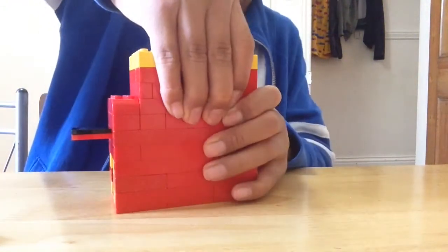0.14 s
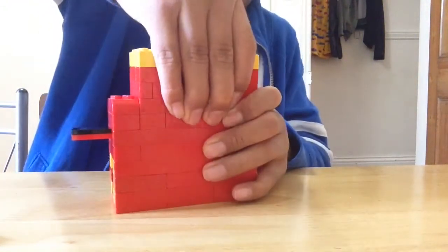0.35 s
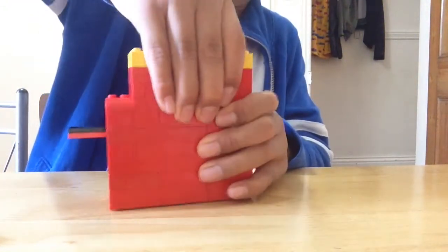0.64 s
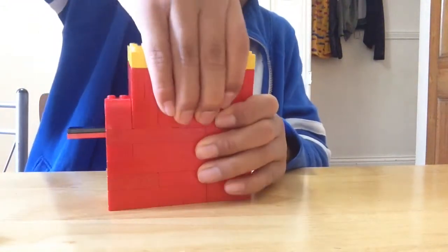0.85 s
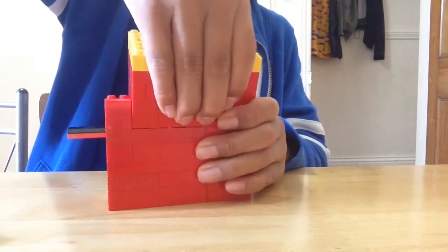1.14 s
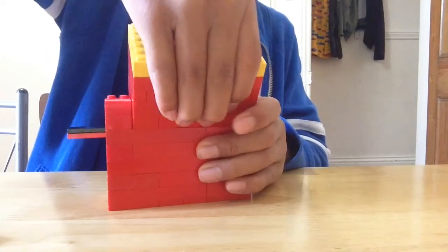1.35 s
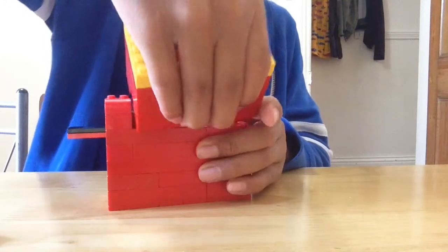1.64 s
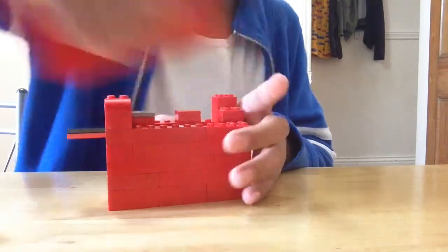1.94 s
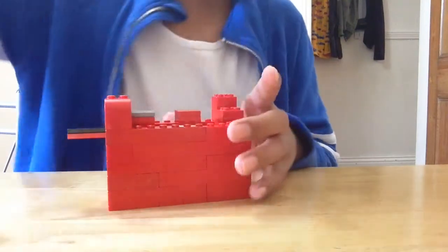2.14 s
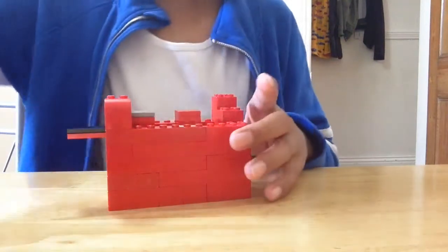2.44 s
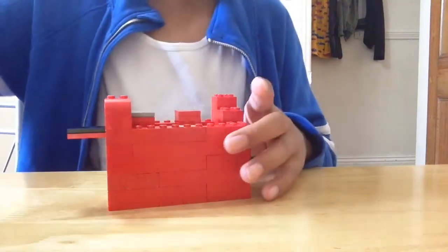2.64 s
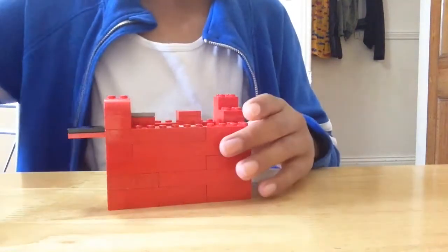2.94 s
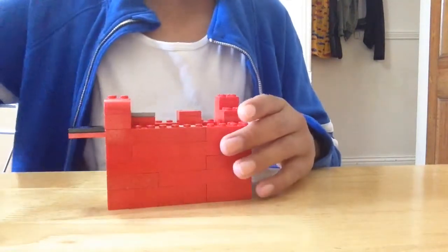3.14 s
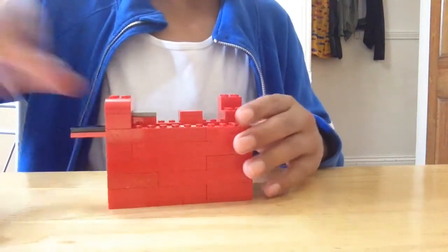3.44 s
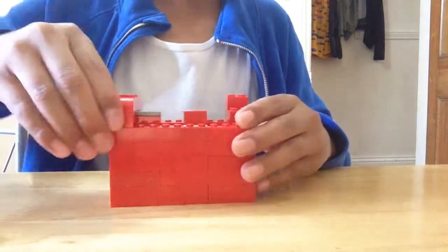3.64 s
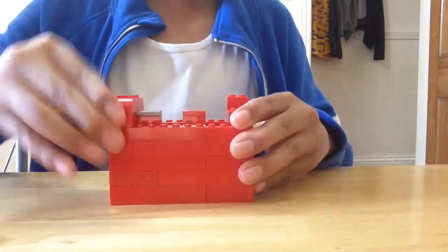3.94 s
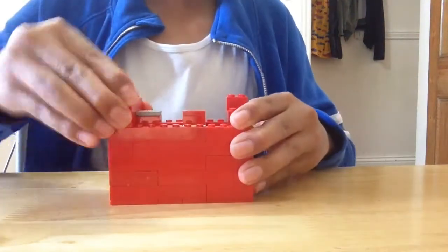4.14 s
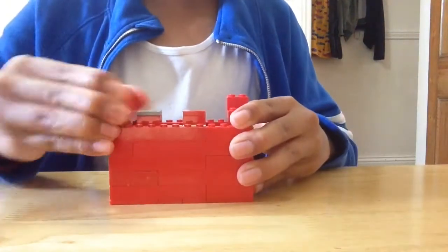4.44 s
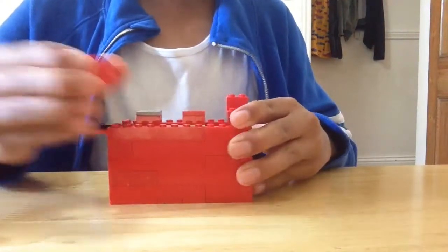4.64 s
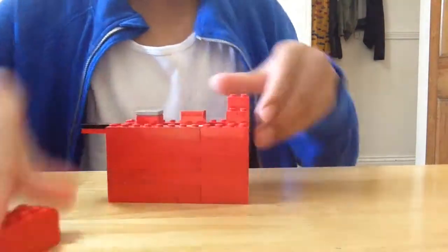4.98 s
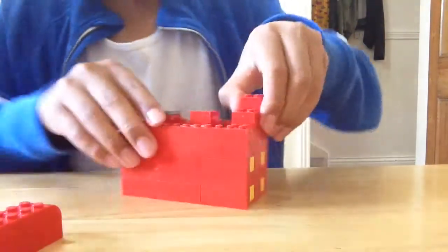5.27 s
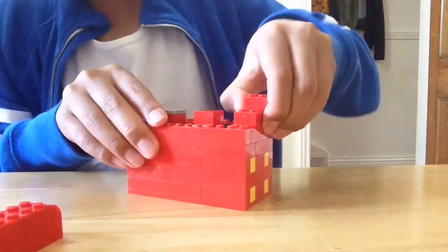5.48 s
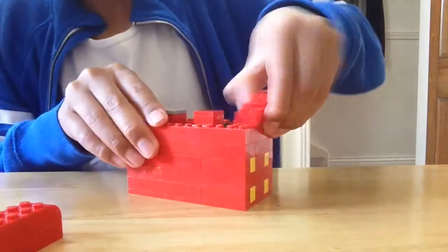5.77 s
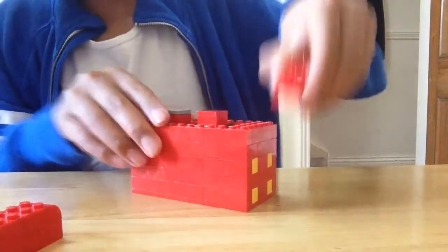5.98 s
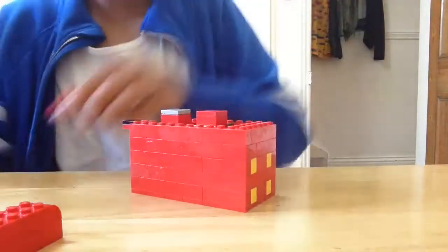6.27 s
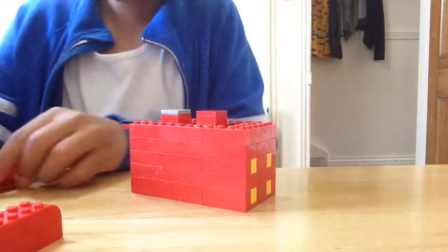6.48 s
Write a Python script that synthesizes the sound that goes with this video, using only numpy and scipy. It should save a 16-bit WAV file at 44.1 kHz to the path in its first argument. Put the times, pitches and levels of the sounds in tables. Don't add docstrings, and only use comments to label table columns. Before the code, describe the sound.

Close up in a small furnished room, plastic toy bricks are pulled apart on a wooden table. Clicks, stud pops and bumps come first, then creaking and a quiet gap. The house drops with a hard thud, loose pieces rattle and sweep, sharp clacks and a loud pop follow, and one small brick is set down. Steady microphone hiss and light sleeve rustle lie beneath.

```python
import sys
import numpy as np
from scipy import signal
from scipy.fft import rfft, irfft
from scipy.io import wavfile
from scipy.ndimage import uniform_filter1d

SR = 44100
rng = np.random.default_rng(int(sys.argv[2]) if len(sys.argv) > 2 else 0)


def generate_wav(sig):
    pcm = np.round(np.clip(np.atleast_2d(sig).T, -1, 1) * 32767).astype(np.int16)
    wavfile.write(sys.argv[1], SR, pcm)


def volts(x):
    e = np.asarray(x, float) / 20
    return 10 ** e


N = 291492
SIZE = 5120
BRICK_CYCLES = 20


def level(x, db):
    return x * volts(db) / np.sqrt(np.mean(x ** 2))


def band(x, lo_hz, hi_hz, order=2):
    return signal.sosfilt(signal.butter(order, [lo_hz, min(hi_hz, .45 * SR)], "band", fs=SR, output="sos"), x)


def highpass(x, hz, order=2):
    return signal.sosfilt(signal.butter(order, hz, "high", fs=SR, output="sos"), x)


def patches(length, hold, smooth):
    held = np.repeat(rng.standard_normal(length // hold + 1), hold)[:length]
    return uniform_filter1d(held, smooth)


def modes(hz, t60, db):
    step = np.exp(-2j * np.pi * np.arange(SIZE // 2 + 1) / SIZE)
    fade = np.exp(-np.log(1000) / t60 / SR)[..., None]
    turn = (2 * np.pi * hz / SR)[..., None]
    ring = fade * np.sin(turn) * step / (1 - 2 * fade * np.cos(turn) * step + (fade * step) ** 2)
    return np.sum(volts(db)[..., None] * ring, axis=-2)


def place(s, db, sounds):
    out = np.zeros(N + SIZE)
    for at, gain, sound in zip(s, volts(db), sounds):
        i = max(int(at * SR), 0)
        out[i:i + SIZE] += gain * sound / np.abs(sound).max()
    return out[:N]


# pitch in Hz, level in dB per Hz
HISS = [(59, -50), (100, -24), (123, -2), (196, 7), (400, 3.5), (1450, -5.5), (3840, -7), (7830, -8.5),
        (15000, -11.5)]


def hiss():
    hz, db = np.transpose(HISS)
    f = np.arange(N // 2 + 1) * SR / N + 1
    colour = volts(np.interp(np.log(f), np.log(hz), db))
    return level(irfft(rfft(rng.standard_normal(N)) * colour, N), -62.7)


# time in seconds, level in dB
RUSTLE = [(0.0, -50), (0.719, -58.5), (0.92, -54), (1.32, -59), (1.53, -71), (2.76, -78), (2.91, -64),
          (3.05, -89), (3.28, -42), (3.44, -50), (3.81, -55), (4.6, -53), (5.03, -46.5), (5.3, -51.5),
          (6.41, -65), (6.61, -67)]


def rustle():
    flicker = volts(2.9 * patches(N, 512, 512))
    brush = level(band(rng.standard_normal(N), 107, 1120) * flicker, -9.0)
    return brush * volts(np.interp(np.arange(N) / SR, *np.transpose(RUSTLE)))


def slip_run(chance, ms):
    t = np.arange(chance.shape[1]) / SR / (np.clip(ms, .2, 8)[:, None] / 1000)
    shape = np.sqrt(np.minimum(t / 0.66, 1) * np.exp(-t))
    run = rfft(chance * shape ** 2)
    return irfft(run / np.abs(run)) * shape


# pitch in Hz, level in dB
BRICK = [(740, -31.5), (960, -20), (1390, -25.5), (1740, -9.5), (2150, -3), (2600, 3.5), (3300, 5),
         (4000, 5), (4800, 2), (5500, 4), (6500, 3), (7800, 3), (9000, 3.5), (10600, 2.5), (12200, 2.5),
         (14000, 4.5)]
# start in seconds, peak level in dB, loudest ring in Hz, edge sharpness in dB.
CLICKS = [(.005, -23.5, 3880, 0), (.197, -30.5, 10200, 11), (.216, -19, 1000, -6.5), (.25, -21, 950, 1),
          (.299, -23, 2390, -52), (.826, -35, 2990, -5), (.962, -32, 11100, -6), (1.402, -34.5, 1550, -12),
          (4.211, -33, 1770, -30), (4.22, -28, 2230, -6), (4.579, -35.5, 1280, 22), (4.885, -13, 2580, -11),
          (4.901, -10, 2700, -14), (5.028, -27.5, 1406, -22), (5.039, -30, 1220, -25),
          (5.541, -19.5, 2960, 10), (6.567, -38.5, 1570, -20)]
BUMPS = [(.088, -16, 828, 5), (.453, -44, 930, -27), (.689, -27.5, 734, -31), (.71, -34, 1030, -9),
         (.736, -39, 732, -11), (1.297, -43, 1600, -16), (1.318, -45, 760, -30), (1.385, -50, 650, -19),
         (1.883, -43.5, 2600, -25), (1.908, -34, 1600, -6), (2.216, -50, 932, -21),
         (2.781, -15.5, 1010, -6), (2.913, -26.5, 1500, -27), (3.022, -26.5, 800, -27),
         (3.983, -33, 680, -40), (4.104, -44, 657, -17), (4.129, -37.5, 670, 2), (4.155, -35, 855, -24),
         (4.563, -35, 1150, -14), (5.15, -45, 845, -26), (5.796, -22, 783, 8), (5.849, -26.5, 2750, -19),
         (6.002, -43, 1457, -30), (6.021, -32.5, 660, -45), (6.314, -35, 978, -32),
         (6.383, -37.5, 689, -25), (6.518, -28, 1300, -25)]
TICKS = [(3.3345, -19, 7900, -2), (3.3415, -28, 2600, -15), (3.352, -25, 4500, -12),
         (3.3555, -18.5, 4200, -14), (3.3875, -25, 2800, -12), (3.404, -19, 3000, -15),
         (3.4115, -21, 2900, -14), (3.4155, -22, 3240, -17), (3.33, -29, 3500, -15),
         (3.365, -30, 3000, -15), (3.5485, -21, 7000, -2), (3.5535, -21, 10000, -2),
         (3.572, -25, 3500, -10), (3.585, -27, 3300, -8), (3.615, -28, 6800, -8), (3.626, -32, 3300, -10),
         (4.985, -21, 3000, -18), (4.991, -26, 2600, -18), (5.017, -25, 3900, -15),
         (4.9025, -5.5, 4530, -9), (1.4015, -33, 2420, -8), (.089, -20.5, 2100, -5)]
PINGS = [(.298, -20.5, 12500, -10), (.278, -28, 11500, -10), (.1, -31, 5000, -8), (.945, -31.5, 5500, -25),
         (.964, -36, 2300, -30), (1.059, -35, 8500, -10), (1.148, -41, 3100, -30), (1.404, -30, 1460, -35),
         (1.413, -34, 1900, -30), (1.419, -33, 1450, -30), (1.444, -35.5, 1400, -35), (2.99, -37, 9000, 0),
         (3.002, -29, 9000, 0), (3.029, -36, 2500, -30), (3.222, -32.5, 5740, -25),
         (3.25, -30.5, 2205, -35), (3.255, -31, 2800, -35), (3.288, -32, 2000, -35), (3.334, -21, 9560, -7),
         (3.341, -24, 2500, -35), (3.351, -28, 2000, -35), (3.355, -23, 3300, -30), (3.415, -28, 2830, -30),
         (3.423, -29, 3200, -35), (3.465, -33.5, 8950, -12), (3.563, -25, 6100, -25),
         (3.571, -30, 6200, -20), (3.607, -34, 3300, -35), (3.628, -40, 2500, -30), (3.683, -34, 6900, -20),
         (3.772, -37, 1388, -40), (4.185, -40, 11000, -10), (4.234, -43, 8460, -10), (4.297, -25, 1990, 3),
         (4.308, -32, 12000, -8), (4.455, -31.5, 795, -40), (4.462, -34, 3000, -30),
         (4.474, -32, 1600, -35), (4.489, -35, 900, -40), (4.566, -42.5, 2850, -35),
         (4.886, -18, 6700, -20), (4.902, -9, 5900, -20), (4.903, -19, 9000, -10), (4.982, -27, 6300, -25),
         (5.004, -23, 5500, -25), (5.015, -22, 5530, -25), (5.029, -29, 3800, -25), (5.039, -31, 5500, -30),
         (5.802, -19, 6800, -20), (5.813, -26, 3750, -25)]
SETTLES = [(5.829, -28, 730, -40.5), (6.32, -34, 910, -32), (6.454, -44, 900, -35), (6.467, -20, 7200, -12),
           (6.478, -23, 4300, -30), (6.482, -24, 4300, -30), (6.519, -30, 5200, -25), (.11, -37, 800, -38),
           (.123, -44, 830, -40), (4.44, -23, 2500, -25), (4.45, -35, 2700, -13), (4.47, -38, 2250, -10),
           (4.3, -30.5, 3230, -20), (.699, -32.5, 1630, -35), (2.939, -30, 1900, -30),
           (3.555, -25, 3200, -25), (3.566, -34, 1130, -35), (3.357, -29, 990, -40),
           (3.375, -35, 1150, -40), (3.389, -35, 1030, -40), (3.28, -29.5, 970, -40),
           (4.887, -21, 1380, -37), (4.99, -31, 1170, -35), (5.865, -33, 630, -40), (5.89, -37.5, 840, -40),
           (3.2, -41, 1200, -40), (5.606, -35, 3200, -24), (5.802, -19, 1600, -25)]
POPS = [(.256, -17, 1510, 20), (.32, -23.5, 2820, 8), (.944, -29, 2100, -30), (1.052, -24, 2190, -28),
        (1.147, -38, 2250, -34), (1.188, -40, 1360, -17), (2.705, -33, 10700, 14),
        (3.275, -18.5, 2190, -11), (3.322, -33, 2620, -22), (3.547, -34, 1430, -12),
        (3.868, -40, 1270, -24), (4.293, -22, 2500, -7), (4.98, -20, 2860, -24), (5.245, -40.5, 1610, -46),
        (5.604, -20, 803.5, -0.5), (5.801, -6.5, 3550, -9)]
TEARS = [(.265, -20, 2190, 8), (.793, -25.5, 1880, -4.5), (.926, -24, 2110, -0.5), (1.044, -22.5, 2220, -4),
         (2.346, -47.5, 1610, -12), (2.733, -30, 10700, -7), (2.765, -14, 1010, -14),
         (2.997, -30.5, 1460, -17), (3.809, -32.5, 2920, -44), (4.184, -33.5, 1953, -35),
         (5.003, -33, 2350, -30), (5.013, -19, 2340, -23), (5.514, -28.5, 2800, -7)]
RATTLE = [(2.894, -39, 1339, -13), (2.978, -30.5, 1350, -11), (3.222, -33, 3080, -32),
          (3.24, -25, 993, -28), (3.334, -32, 955, -25), (3.354, -22, 970, -32), (3.373, -26, 3050, -33),
          (3.387, -22, 3120, -34), (3.403, -25, 1350, -33), (3.411, -26, 2000, -33), (3.463, -34, 925, -17),
          (3.484, -29, 2720, -26), (3.553, -20, 9750, -5), (3.6, -34, 3900, -33), (3.648, -34, 1340, -28),
          (3.738, -33, 1400, -35), (4.324, -39, 880, -47)]
CLACKS = [
    (6.467, -11, 4030, -22),
    (4.439, -15.5, 1730, -4),
    (2.938, -26, 990, -28),
    (4.901, -12.5, 3980, -16),
    (4.915, -18.5, 6300, -16),
]
# events, weight of the low modes in dB, slip burst in ms, weight of the loudest ring in dB
CONTACTS = [(BUMPS, 9.6, 2.15, 4.3), (POPS, -4, 1.19, 4.3), (TEARS, -23, 3.7, 3.8), (CLICKS, -41, 1.58, 5),
            (RATTLE, -30, 1.25, -2), (CLACKS, -31, 1.33, 18), (PINGS, -40, 1.1, 22), (SETTLES, -40, 1.48, 17),
            (TICKS, -35, 0.37, 7.1)]


def snaps():
    events = [(*row, *kind) for rows, *kind in CONTACTS for row in rows]
    s, db, ring_hz, top_db, body_db, ms, ring_db = np.transpose(events)
    ring_hz, top_db, body_db, ring_db = (x[:, None] for x in (ring_hz, top_db, body_db, ring_db))
    hz, mode_db = np.transpose(BRICK)
    detune = rng.standard_normal((len(s), len(hz)))
    slips = slip_run(rng.standard_normal((len(s), 1024)), ms)
    octaves = np.log2(hz / 3000)
    low = np.clip(-octaves / 1.185, 0, 1) * (body_db + 23.5)
    high = np.clip(octaves / 1.81, 0, 1.4) * (top_db + 15)
    body = modes(hz * (1 + .03 * detune), BRICK_CYCLES / hz, mode_db + low + high)
    ring_t60 = np.minimum(2 * BRICK_CYCLES / ring_hz, .016)
    ring = modes(ring_hz * np.array([.955, 1.05]), ring_t60, ring_db - 2)
    f = np.arange(SIZE // 2 + 1) * SR / SIZE
    soft = (1 + 1j * f / (9000 * volts(0.39 * (top_db + 36.0)))) ** -2
    sound = irfft(rfft(slips, SIZE) * (body + ring) * soft, SIZE)
    return place(s, db + 1.0, highpass(sound, 420))


# delay in seconds, level in dB
ECHOES = [
    (.0025, -17),
    (0.013, -19.5),
    (0.017, -20),
    (0.021, -27.5),
]
# time in seconds, level in dB
FAR = [(0, -8.5), (.6, -13), (1.3, -7), (1.6, -7), (2.7, -11), (3.2, -7.5), (3.9, -12), (4.2, -15),
       (4.6, -9.5), (4.9, -13), (5.3, -12), (5.9, -8.5), (6.6, -11.5)]
# pitch in Hz, time to fade by 60 dB in seconds
ROOM_T60 = [(150, 0.53), (400, 0.49), (1000, 0.33), (2500, 0.3), (6000, 0.39), (14000, 0.29)]


def room(x):
    t = np.arange(SR // 2) / SR
    unit_db = -10 * np.log10(len(t))
    out = sum(volts(db) * np.r_[np.zeros(int(s * SR)), x][:N] for s, db in ECHOES)
    far_db = np.interp(np.arange(N) / SR, *np.transpose(FAR))
    responses = 4
    active = np.repeat(rng.integers(0, responses, N // 1024 + 1), 1024)[:N]
    for k in range(responses):
        tail = np.zeros(len(t))
        for hz, t60 in ROOM_T60:
            noise = band(rng.standard_normal(len(t)), hz / 2.24, hz * 1.1)
            tail += level(noise, 10 * np.log10(hz)) * volts(-60 * t / t60)
        tail = level(tail * np.minimum(t / 0.019, 1), unit_db)
        scatter = level(rng.standard_normal(len(t)) * volts(-60 * t / 0.057), 6 + unit_db)
        out = out + signal.fftconvolve(x * volts(far_db) * (active == k), tail + scatter)[:N]
    return out


# pitch in Hz, time to fade by 60 dB in seconds, level in dB
TABLE = [(137, 0.073, -48), (201, 0.32, -4), (242, 0.1, 3), (291, 0.11, 8.5), (363.3, 0.062, 11),
         (462, 0.18, 5), (556, 0.19, 1), (817, 0.12, -5), (935, .04, -36), (1350, 0.035, -27)]
# start in seconds, peak level in dB, loudest mode in Hz
RAPS = [(.084, -30, 395), (.451, -48, 433), (.69, -16, 291), (1.044, -26.5, 320), (1.217, -42.5, 254.6),
        (1.318, -38.5, 291), (1.386, -40, 290), (1.915, -34.5, 291), (3.022, -33, 328), (3.237, -34.5, 291),
        (3.829, -36, 242), (4.15, -46, 303), (4.451, -35, 289), (4.751, -36.5, 399), (4.807, -40, 299.9),
        (5.147, -31.5, 325), (5.603, -35, 323), (6.021, -29, 328), (6.348, -30, 377), (6.466, -53, 450)]
# start in seconds, peak level in dB, loudest mode in Hz
DROPS = [(.213, -30, 300), (.252, -25, 262), (.294, -30, 308.6), (1.491, -46, 247), (2.351, -46, 173),
         (2.765, -14.5, 340), (2.783, -17, 292), (2.936, -28, 407), (3.286, -36, 355), (3.541, -33.5, 294),
         (3.982, -24, 200), (4.105, -37.5, 213), (4.194, -39.5, 191), (4.489, -31, 300),
         (4.883, -28.5, 312), (4.979, -30, 300), (5.8, -22, 268), (6.308, -33, 471), (6.517, -46, 522.3),
         (6.568, -44.5, 300), (2.912, -32.5, 300), (3.32, -34, 300), (5.014, -31, 300), (6.385, -33, 327),
         (6.33, -38, 400), (1.085, -36, 330), (4.458, -34, 300), (2.774, -18.5, 300), (2.806, -25, 400)]


def thuds():
    push_ms = [(RAPS, 0.86), (DROPS, 1.54)]
    s, db, spot_hz, ms = np.transpose([(*row, ms) for rows, ms in push_ms for row in rows])
    hz, t60, mode_db = np.transpose(TABLE)
    chance = rng.standard_normal((len(s), len(hz)))
    t = np.arange(512) / SR / (ms[:, None] / 1000)
    push = np.sin(np.pi * np.minimum(t, 1)) ** 2
    near = 12 * np.exp(-(np.log(hz / spot_hz[:, None]) / .15) ** 2)
    plate = modes(hz * (1 + 0.031 * chance[:, ::-1]), 0.57 * t60, mode_db + near + 1.8 * chance)
    sound = irfft(rfft(push, SIZE) * plate, SIZE)
    return place(s + 0.0011, db - 1.24, highpass(sound, 150))


# start in seconds, length in seconds, level in dB,
# change to the end in dB, edge sharpness in dB.
GRINDS = [
    (.215, 0.085, -53, -9, 17.5),
    (.3, 0.061, -62.5, -13, 12),
    (.925, 0.12, -69, -10.5, 17),
    (2.705, 0.03, -67, -1, 16),
    (2.73, 0.039, -62.5, -4, 20.5),
    (2.8, 0.15, -68.5, -1, 19.5),
    (4.98, .064, -56, -3.5, 6),
    (2.796, .02, -68.5, -5, 21),
    (6.3, 0.12, -69.5, -12, 3.5),
]
SHOVES = [(2.97, 0.26, -55.5, 1.5, -2), (3.22, 0.13, -45.5, 3, -6.5), (3.33, 0.1, -50, 1, -8),
          (3.44, 0.099, -52, 3, -6), (3.545, 0.21, -40, -17.5, -9), (3.725, 0.283, -50.5, -15, -4),
          (1.145, 0.089, -58, -3.5, -12), (1.82, .09, -65.5, 0, -8), (2.2, .19, -69.5, 2, -8),
          (4, 0.11, -64, -4, -7), (5.33, .15, -62.5, -4.5, -18), (6.38, 0.036, -59, -2, -12),
          (4.444, .06, -42.5, -16, -1), (1.3, .1, -47.5, -25, -6.5), (6.31, 0.033, -55, -2, -13),
          (6.385, .04, -60, -6, -12), (3.595, .04, -53, -4, -10)]
SWEEPS = [
    (1.402, 0.16, -44.5, -21, -4.5),
    (3.532, 0.02, -49.5, 12, -2),
    (3.553, .16, -43.5, -13, -5.5),
    (3.33, 0.092, -53, -5, -2),
    (3.73, 0.053, -57, -6, -4),
]


def scrape():
    out, t = np.zeros(N), np.arange(N) / SR
    clumps = volts(1.9 * patches(N, 256, 128))
    ticks = rng.standard_normal(N) * (rng.random(N) < .25)
    ticks = ticks * volts(2.3 * rng.exponential(size=N)) * clumps ** 1.5
    hz, mode_db = np.transpose(BRICK)
    rung = signal.fftconvolve(ticks, irfft(modes(hz, .5 * BRICK_CYCLES / hz, mode_db), SIZE))[:N]
    body = level(band(rung, 750, 2550), 0)
    middle = level(band(rung, 2000, 6570), 0)
    top = level(band(rung, 4500, 12400), 0)
    for rows, body_db in [(GRINDS, 16.5), (SHOVES, -1), (SWEEPS, -9.5)]:
        for s, length, db, change_db, top_db in rows:
            attack = np.clip((t - s) / 0.0054, 0, 1)
            slope_db = change_db * np.clip((t - s) / length, 0, 1)
            gain = attack * (t < s + length) * volts(db + slope_db)
            out += gain * (volts(body_db) * body + middle + volts(top_db) * top)
    return out


# start
# in seconds, pitch in Hz, level in dB, time to fade by 60 dB in seconds, width in Hz
RINGS = [(.963, 11100, -50, 0.25, 300), (1.14, 6700, -58.5, 0.51, 200), (2.706, 10750, -47, .25, 350),
         (2.731, 10710, -40, 0.22, 350), (2.803, 10680, -43.5, 0.51, 250), (3.553, 9950, -42, 0.33, 300),
         (3.556, 6900, -43, 0.72, 300), (5.801, 6900, -38.5, 0.23, 250), (6.472, 4400, -43, .36, 200),
         (6.472, 4600, -46, 0.36, 200), (6.472, 3650, -47, .3, 200), (6.472, 4300, -47, .3, 200),
         (6.312, 400, -43.5, 0.5, 140), (5.81, 440, -44, .6, 200), (1.404, 1400, -46, .3, 300),
         (4.745, 350, -49.5, 0.52, 130), (3.35, 960, -45, .4, 110), (3.35, 3070, -46, .4, 270),
         (3.555, 3250, -46, 0.57, 250), (2.73, 8040, -54, 0.4, 300), (4.905, 6220, -39, 0.16, 500),
         (5.003, 5510, -42, 0.19, 300), (3.1, 1000, -70, 0.27, 220), (2.83, 4210, -56, .6, 250),
         (2.3, 4180, -68.5, .9, 340), (3.62, 14000, -64, 0.74, 300), (2.86, 6000, -61, 0.32, 250),
         (2.715, 4250, -53, .15, 250), (4.445, 1620, -54, .25, 200)]


def rings():
    out, t = np.zeros(N + SR), np.arange(SR) / SR
    patchy = volts(2.5 * patches(N + SR, 512, 256))
    for s, hz, db, t60, width_hz in RINGS:
        i = int(s * SR)
        narrow = band(rng.standard_normal(SR), hz - width_hz / 2, hz + width_hz / 2)
        out[i:i + SR] += volts(-60 * t / t60) * level(narrow * patchy[i:i + SR], db)
    return out[:N]


def scene():
    table = thuds()
    bricks = signal.sosfilt(signal.butter(2, 14000, fs=SR, output="sos"), snaps() + scrape())
    answer = room(bricks + volts(-2.5) * table)
    return (bricks + table + answer + rings() + hiss() + rustle())[None]


def low_pass(x):
    return signal.sosfilt(signal.butter(12, 16470, fs=SR, output="sos"), x)


def record(dry):
    thin = highpass(dry, 140, 6)
    rumble = level(band(rng.standard_normal(N), 25, 110), -100)
    thin = thin + rumble + volts(-20) * dry
    thin = signal.sosfilt(signal.ellip(7, .3, 30, 15250, fs=SR, output="sos"), thin)
    mix = np.tanh(1.1 * thin) / 1.1
    return low_pass(mix)


dry = scene()
out = record(dry)
generate_wav(out)
```